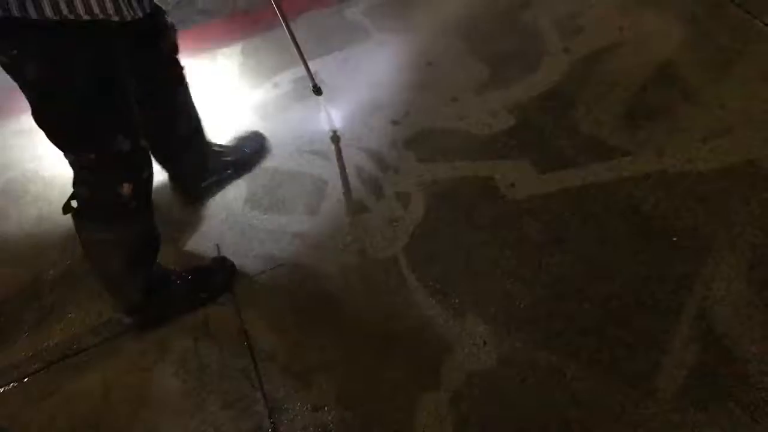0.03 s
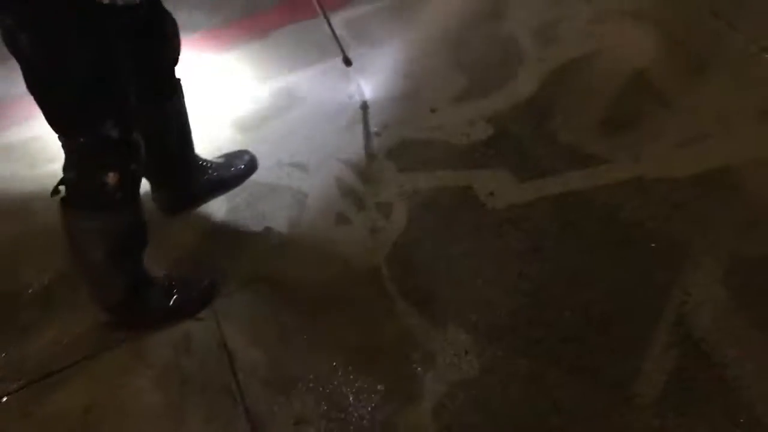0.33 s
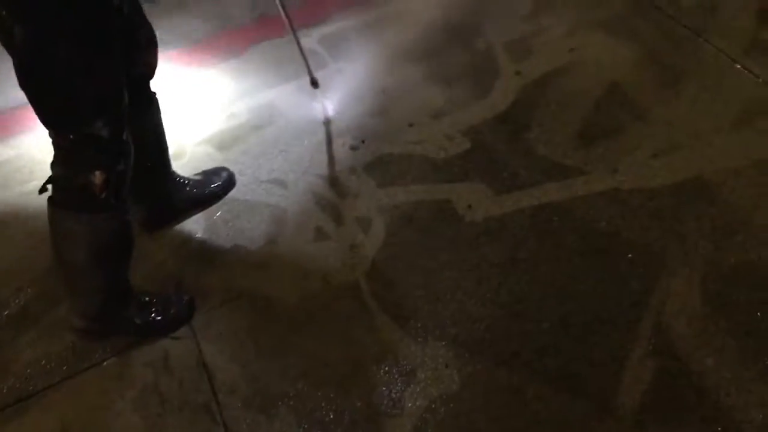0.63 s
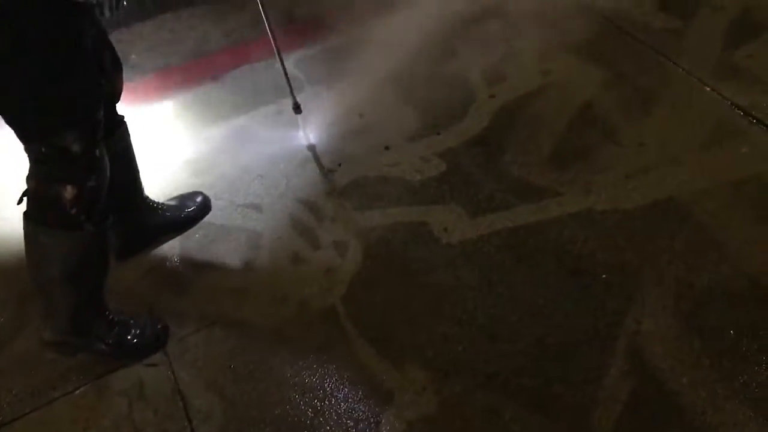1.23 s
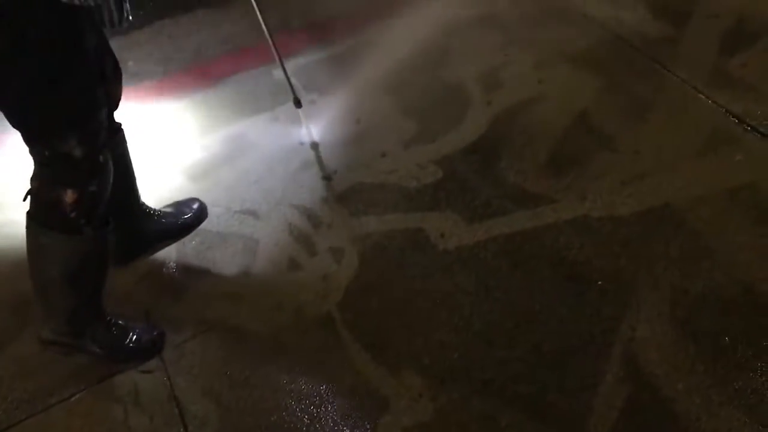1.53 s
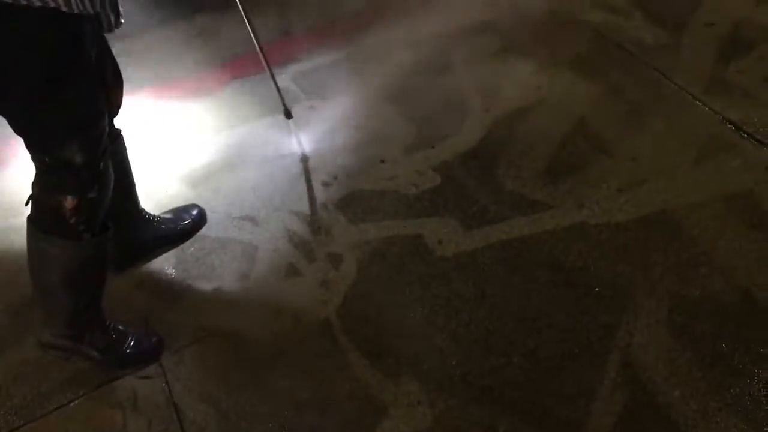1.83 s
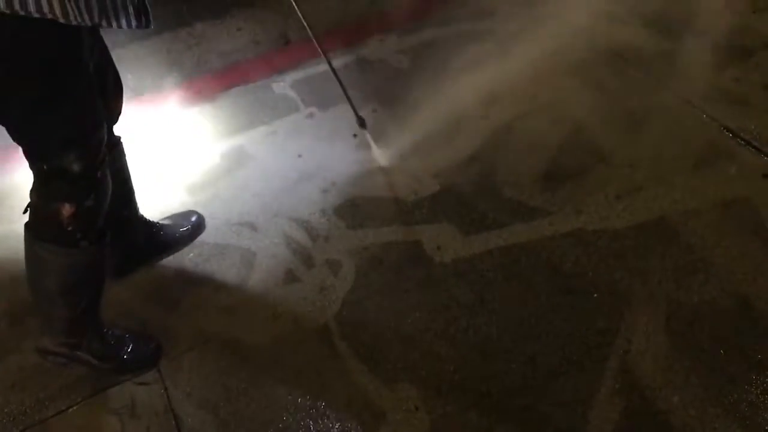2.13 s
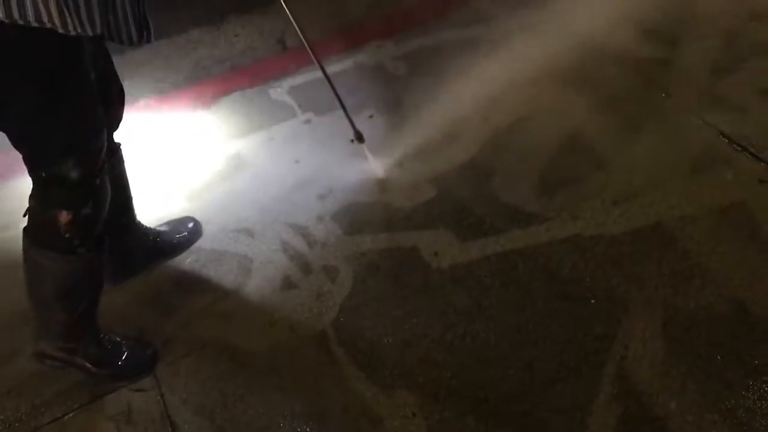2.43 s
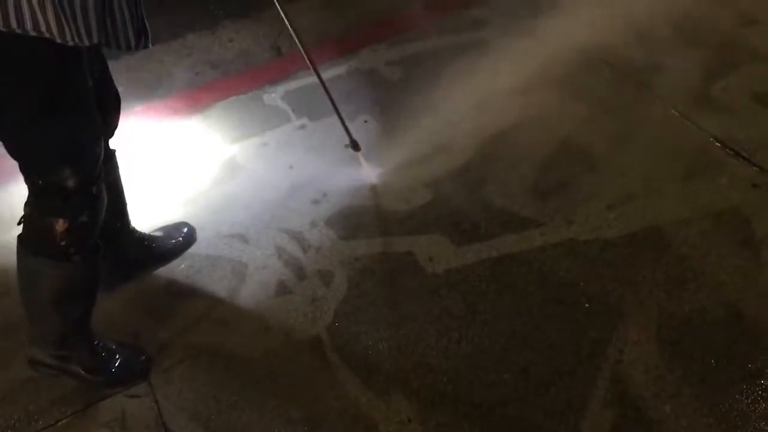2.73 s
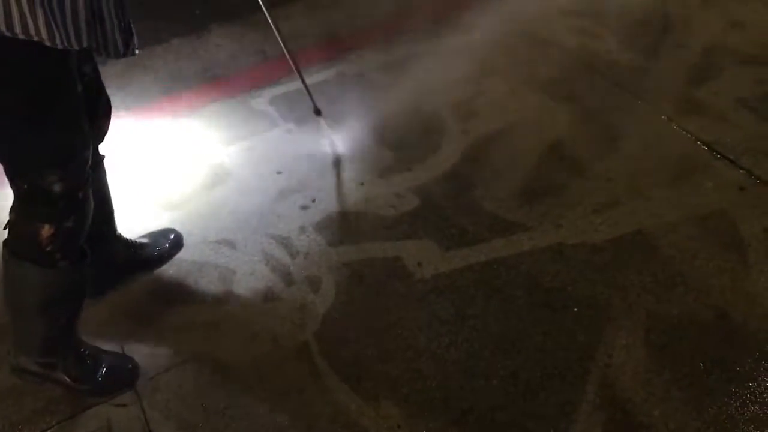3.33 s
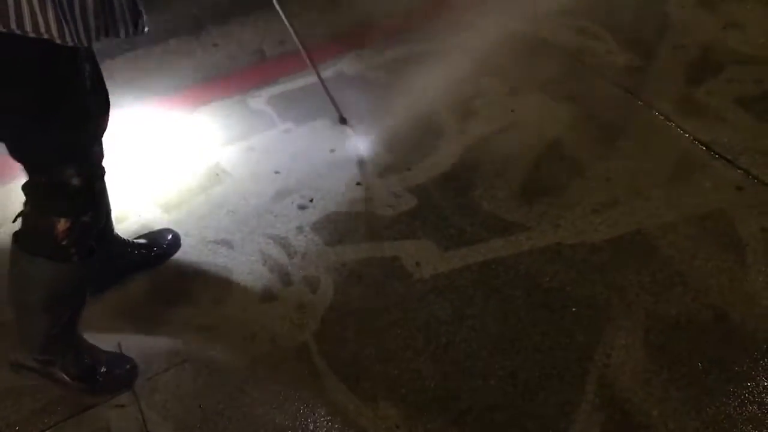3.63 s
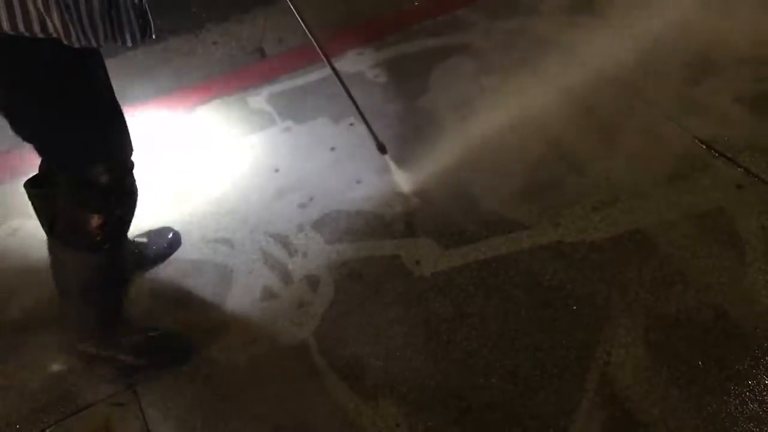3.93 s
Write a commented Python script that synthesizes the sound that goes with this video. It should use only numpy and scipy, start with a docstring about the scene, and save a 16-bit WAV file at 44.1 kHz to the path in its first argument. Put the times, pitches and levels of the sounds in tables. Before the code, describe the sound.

Pressure washer spray hits wet concrete with a bright, raspy hiss, its engine droning further off.

```python
"""A bright hiss that turns raspy now and then: a pressure washer's jet sweeps wet concrete outdoors.
Countless droplets hit the ground about a metre away, and one close echo colours their hiss as the
wand moves. Further off, the washer's single-cylinder engine drones beside a low hum and rumble.
In the second half, hollow, whistle-like bands of noise come and go in the spray."""
import sys
import numpy as np
from scipy import signal
from scipy.fft import rfft, irfft, next_fast_len
from scipy.io import wavfile
from scipy.ndimage import map_coordinates

SR = 44100
rng = np.random.default_rng(int(sys.argv[2]) if len(sys.argv) > 2 else 0)


def generate_wav(sig):
    """Save sig (samples, or channels by samples) to the path in sys.argv[1] as 16-bit PCM at SR."""
    pcm = np.round(np.clip(np.atleast_2d(sig).T, -1, 1) * 32767).astype(np.int16)
    wavfile.write(sys.argv[1], SR, pcm)


N = 176400  # 4 seconds


def amp(db):
    """Turn decibels into a number to multiply a sound by."""
    return 10 ** (np.asarray(db) / 20)


def unit(x):
    """Scale a sound so that its average size (rms) is 1."""
    return x / np.sqrt(np.mean(x ** 2) + 1e-20)


def curves(rows):
    """Join timed points with straight lines: one curve for each column after the time."""
    times, *columns = np.transpose(rows)
    return [np.interp(np.arange(N) / SR, times, column) for column in columns]


def wobble(rate):
    """A smooth curve through `rate` random values a second."""
    points = rng.standard_normal(int(N * rate / SR) + 4)
    return map_coordinates(points, [np.arange(N) * rate / SR])


def filtered(x, response):
    """Make each frequency in x louder or softer by the factor response(hz)."""
    size = next_fast_len(N + SR // 2)
    hz = np.fft.rfftfreq(size, 1 / SR)
    return irfft(rfft(x, size) * response(hz), size)[:N]


def coloured(x, colour):
    """Shape the bass and treble of x with a table of f/Hz, level/dB."""
    freqs, db = np.transpose(colour)
    return filtered(x, lambda hz: amp(np.interp(np.log(hz + 1), np.log(freqs + 1), db)))


def delayed(x, lag_ms):
    """Make x arrive late by a delay that may keep changing."""
    return map_coordinates(x, [np.arange(N) - lag_ms * SR / 1000], order=3)


def tone(cycles, db, tremble_db):
    """A pure tone with a trembling level; `cycles` counts its vibrations so far."""
    gain = np.sqrt(2) * amp(db + tremble_db * wobble(11))
    return gain * np.sin(2 * np.pi * (cycles + rng.random()))


def spray(level_db=-16.5, drops_per_s=900):
    """Droplets of very uneven size strike the concrete; four bands swell and fade as the jet moves."""
    # tone colour of the spray: f/Hz, level/dB
    colour = [(240, -31), (450, -13), (620, -6.0), (820, -5), (1050, -2), (1250, -7), (1550, -3.5),
              (1850, -3), (2200, -6.5), (2700, -5.5), (3300, -3), (3900, -4.5), (4450, -2), (4900, -5.5),
              (5400, -4), (6100, -3.5), (6500, -1), (7100, -2), (7700, -3), (8400, -2.0), (9000, -1.6),
              (9600, -1), (10300, -4.2), (10900, -2), (11700, 0.5), (12500, 0.8), (14000, 0.6),
              (15500, -1.9)]
    # centres of the rasp, spatter, hiss and fizz bands: f/Hz
    centres = [1500, 3700, 8500, 13500]
    # swell of each band (only the rise and fall around its average counts): t/s, level/dB
    rasp = [(0.16, -30), (0.27, -31), (1.03, -31.5), (1.16, -27.5), (1.19, -31.5), (1.4, -30.5),
            (1.77, -31), (1.93, -27), (1.98, -31.5), (2.38, -29.5), (2.43, -31), (2.93, -31), (3.68, -31.5),
            (4.0, -29.5)]
    spatter = [(0.16, -27), (0.57, -27), (0.75, -25.5), (0.76, -28.5), (0.99, -29), (1.1, -25), (1.3, -28),
               (1.36, -24), (1.39, -28), (1.67, -28), (1.92, -25), (1.98, -28.5), (2.43, -26), (3.29, -28),
               (3.47, -24), (3.51, -26.5), (4.0, -27)]
    hiss = [(0.16, -22.5), (0.54, -23), (1.05, -26), (1.13, -23), (1.29, -26), (1.3, -24), (2.72, -24),
            (3.2, -25), (3.74, -23), (3.77, -25), (4.0, -23.5)]
    fizz = [(0.16, -21), (0.17, -22), (1.19, -23.5), (1.22, -21.5), (1.77, -22), (1.81, -23), (2.41, -20),
            (2.5, -22.5), (3.24, -20.5), (3.26, -26), (3.29, -21), (3.53, -25.5), (3.67, -20), (4.0, -23)]
    mist = rng.standard_normal(N) * amp(3 * rng.standard_normal(N))
    hard_drops = (rng.random(N) < drops_per_s / SR) * rng.laplace(size=N)
    sputter = amp(0.53 * wobble(40))
    splash = unit(coloured((mist + hard_drops) * sputter, colour))
    out = np.zeros(N)
    for share, swell in zip(np.eye(len(centres)), (rasp, spatter, hiss, fizz)):
        # each band is full at its own centre and gone at its neighbours'
        band = filtered(splash, lambda hz: np.interp(hz, centres, share))
        [swell_db] = curves(swell)
        flicker_db = 0.5 * wobble(14)
        out += band * amp(swell_db - swell_db.mean() + flicker_db)
    return amp(level_db) * out


def with_echoes(x, faint_count=5, faint_db=-24.5, drift_ms=0.021):
    """Add one close echo that follows the wand, and faint ones off boots, legs and kerb."""
    # the close echo as the wand moves: t/s, delay/ms, strength/0-1
    echo_path = [(.2, 0.79, 0.06), (.55, .742, 0.1), (.95, 0.74, 0.2), (1.4, 0.73, 0.18), (1.9, 0.78, 0.17),
                 (2.15, 0.72, 0.13), (2.45, .712, 0.17), (2.9, 0.71, 0.14), (3.3, 0.73, 0.22),
                 (3.55, 0.77, 0.03), (3.8, 0.71, 0.1), (4, 0.77, 0.1)]
    # tone colour of the close echo: f/Hz, level/dB
    echo_colour = [(500, 0), (1600, 1.5), (3200, -4.5), (5500, 0.5), (8300, 0.5), (10000, -5), (15000, -16)]
    lag_ms, strength = curves(echo_path)
    close = strength * delayed(coloured(x, echo_colour), lag_ms)
    dull = filtered(x, lambda hz: 1 / (1 + (hz / 8000) ** 4))
    faint_lags_ms = rng.uniform(1.21, 7, size=faint_count)
    faint = sum(delayed(dull, ms + drift_ms * wobble(1.55)) for ms in faint_lags_ms)
    return x + close + amp(faint_db) * faint


def engine(firing_hz=28.55, jitter_cycles=0.0043):
    """The exhaust drones at a nearly steady speed; uneven firing roughens its higher tones."""
    # exhaust tones: multiple of the firing rate, level/dB
    harmonics = [(2, -41.5), (3, -43), (5, -42.5), (6, -47), (7, -53.5), (8, -48.5), (9, -51), (10, -53),
                 (11, -59), (12, -58)]
    rate_hz = firing_hz * (1 + 0.001 * wobble(2.98))
    cycles = np.cumsum(rate_hz) / SR + jitter_cycles * wobble(firing_hz)
    return sum(tone(multiple * cycles, db, tremble_db=0.73) for multiple, db in harmonics)


def hum():
    """A second machine's wavering hum throbs against the engine's nearby tones."""
    # tones of the hum: f/Hz, level/dB
    tones = [(59.8, -55), (119.6, -48.5)]
    wavering_time = np.cumsum(1 + 0.0059 * wobble(4)) / SR
    return sum(tone(hz * wavering_time, db, tremble_db=1) for hz, db in tones)


def rumble(level_db=-40):
    """The steady, deep noise of the outdoors."""
    # tone colour of the rumble: f/Hz, level/dB
    colour = [(20, -24), (38, -16), (55, -3), (75, 2), (100, -1.5), (125, -5), (160, -8), (250, -10.5),
              (340, -6), (450, -14), (800, -20), (2000, -48)]
    return amp(level_db) * unit(coloured(rng.standard_normal(N), colour))


def hollow_bands(fade_s=0.05):
    """Narrow, hollow-sounding bands of noise come and go in the spray."""
    # one band a row: start/s, end/s, f/Hz, half width/Hz, level/dB
    bands = [(2.18, 3.38, 1584, 150, -38), (2.11, 3.4, 8270, 170, -34), (3.8, 4.1, 8400, 170, -34),
             (3.82, 4.1, 554, 28, -41.5)]
    t = np.arange(N) / SR
    out = np.zeros(N)
    for start, end, centre_hz, half_width_hz, db in bands:
        noise = rng.standard_normal(N)
        band = unit(filtered(noise, lambda hz: 1 / (1 + ((hz - centre_hz) / half_width_hz) ** 2)))
        fade = np.clip(np.minimum(t - start, end - t) / fade_s, 0, 1)
        out += amp(db) * band * fade
    return out


def scene():
    """Add up all the sounds, the same in the left and right channels."""
    mono = with_echoes(spray()) + engine() + hum() + rumble() + hollow_bands()
    return np.array([mono, mono])


def record(dry):
    """The sound starts suddenly after a short silence, and its very highest treble is cut away."""
    start_s, top_hz = 0.1505, 15720
    started = np.arange(N) / SR >= start_s
    low_pass = signal.ellip(14, 0.1, 90, top_hz, fs=SR, output="sos")
    return signal.sosfilt(low_pass, dry * started)


dry = scene()
out = record(dry)
generate_wav(out)
```